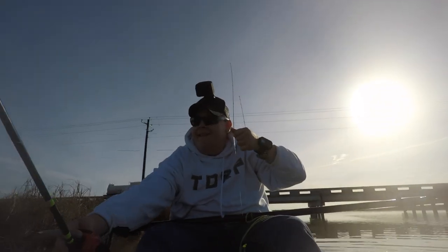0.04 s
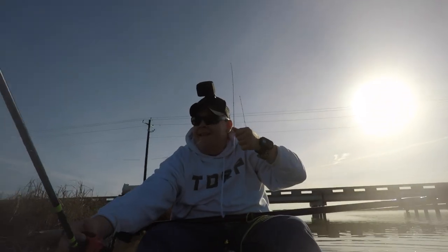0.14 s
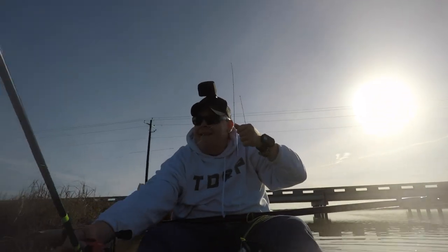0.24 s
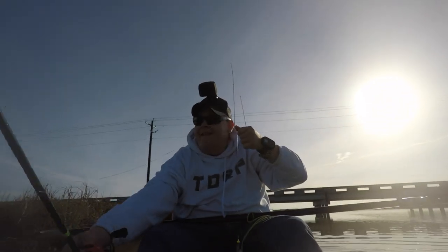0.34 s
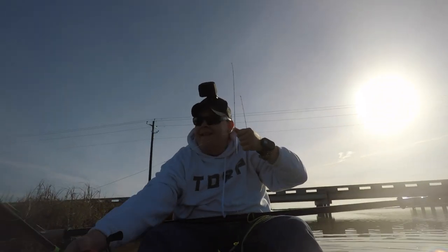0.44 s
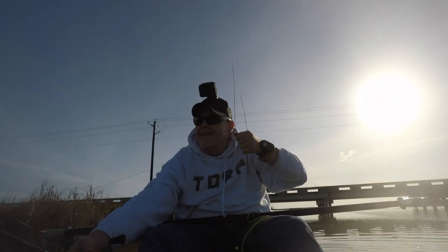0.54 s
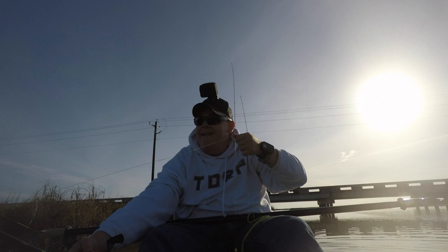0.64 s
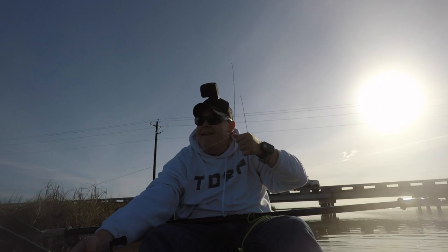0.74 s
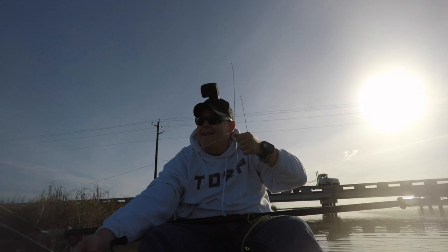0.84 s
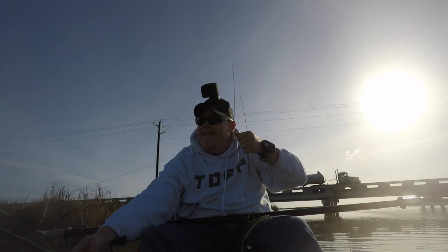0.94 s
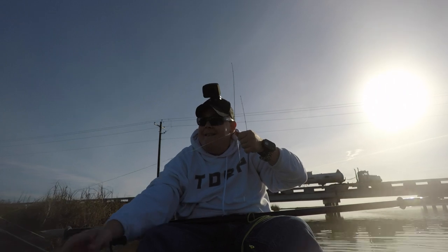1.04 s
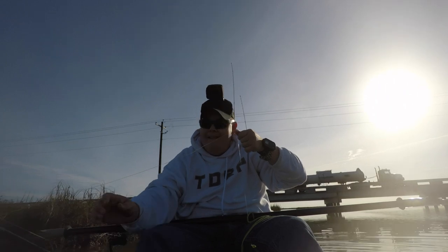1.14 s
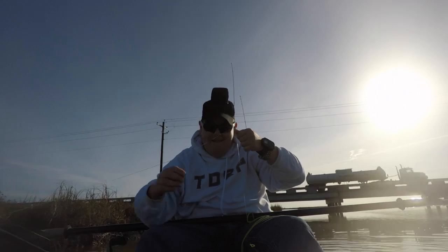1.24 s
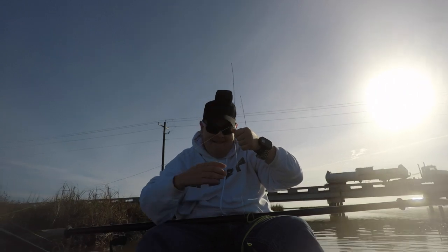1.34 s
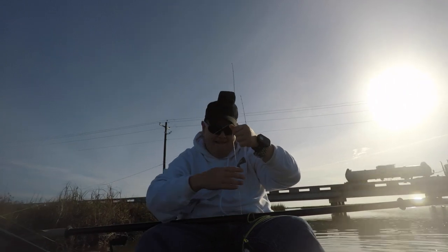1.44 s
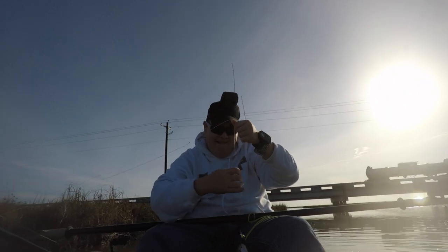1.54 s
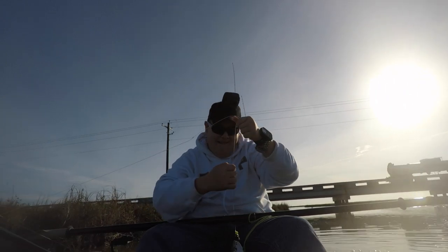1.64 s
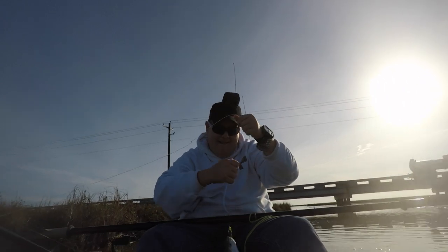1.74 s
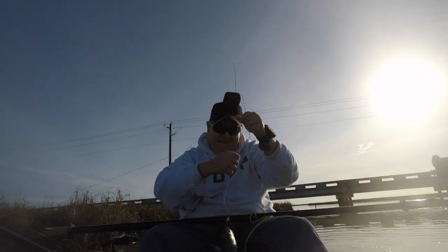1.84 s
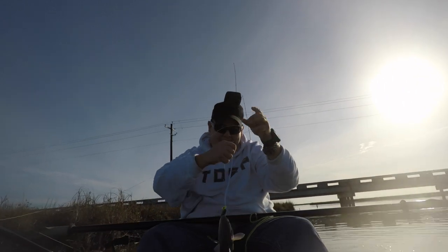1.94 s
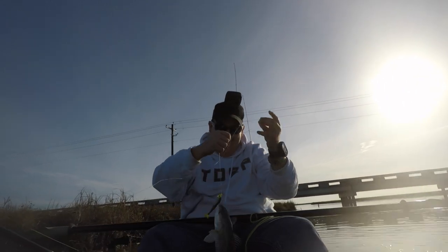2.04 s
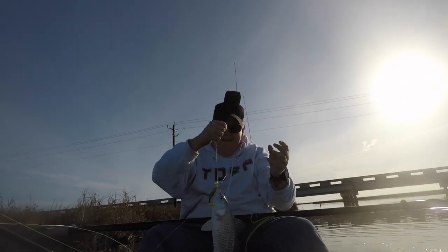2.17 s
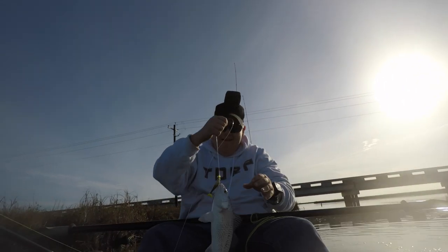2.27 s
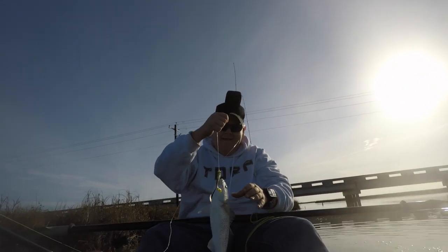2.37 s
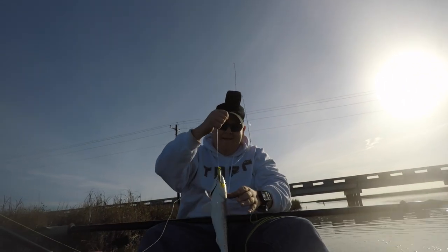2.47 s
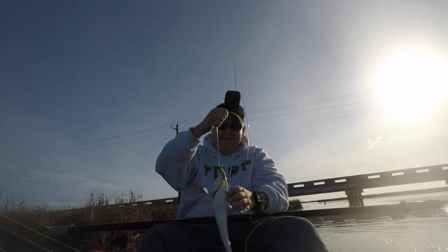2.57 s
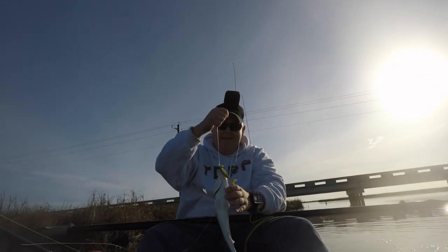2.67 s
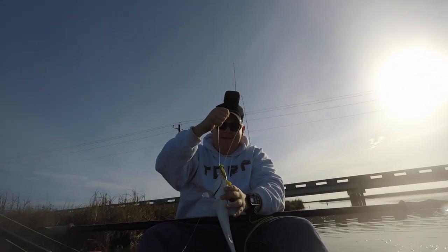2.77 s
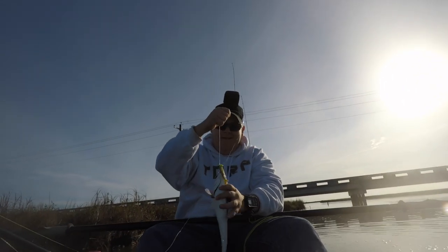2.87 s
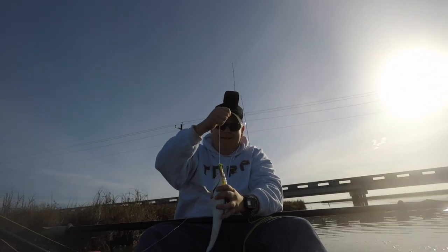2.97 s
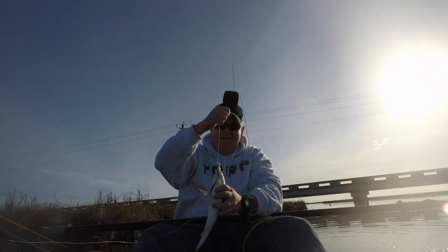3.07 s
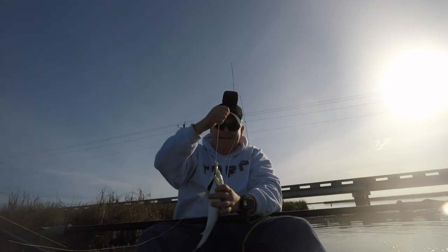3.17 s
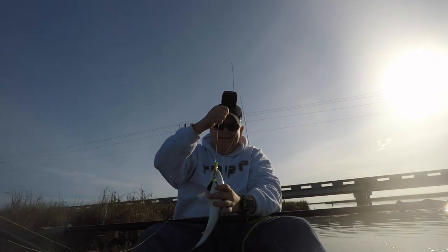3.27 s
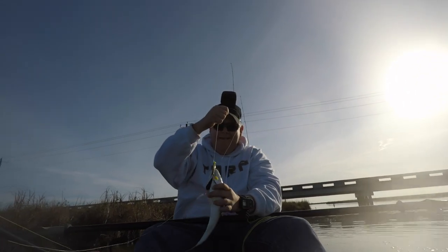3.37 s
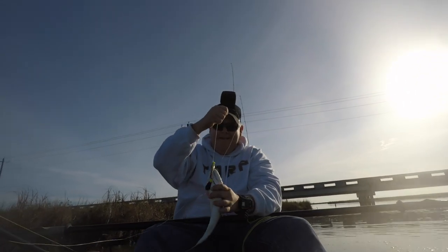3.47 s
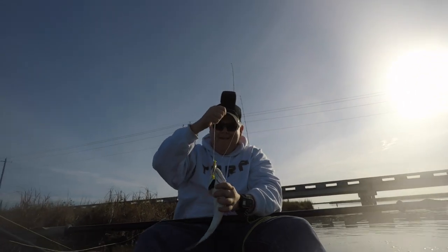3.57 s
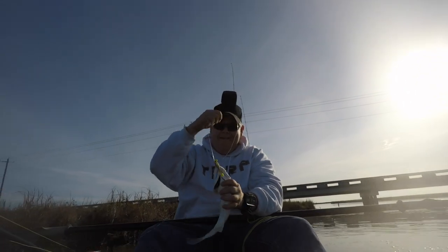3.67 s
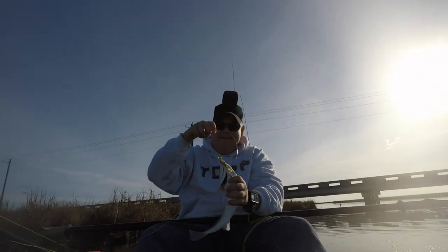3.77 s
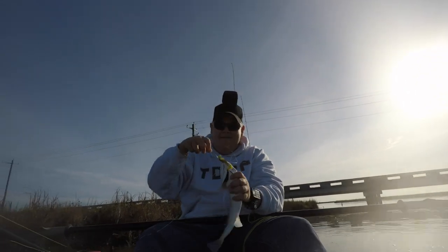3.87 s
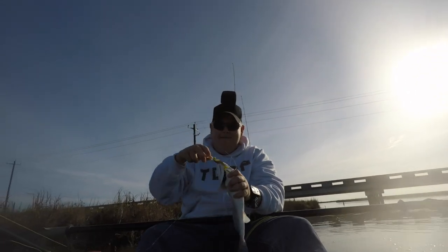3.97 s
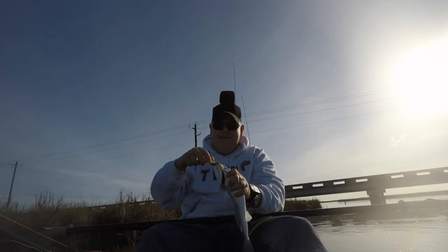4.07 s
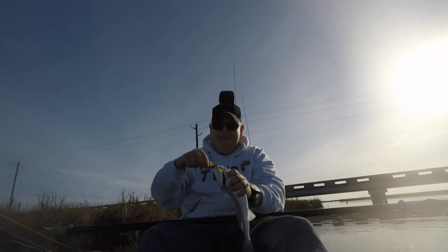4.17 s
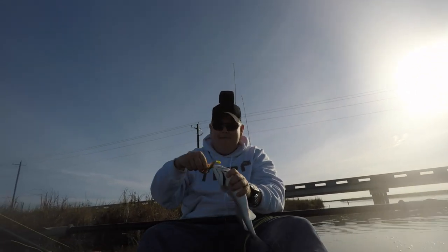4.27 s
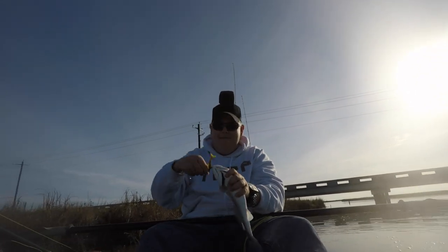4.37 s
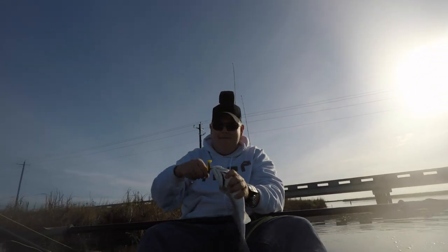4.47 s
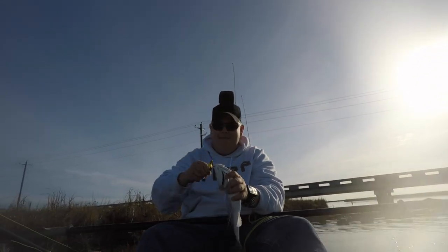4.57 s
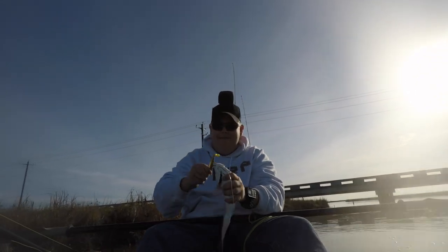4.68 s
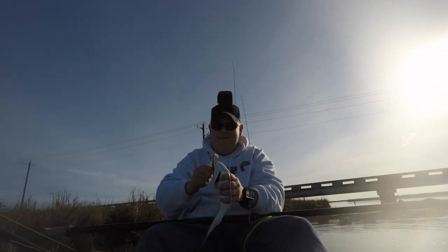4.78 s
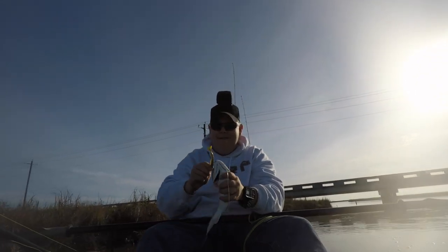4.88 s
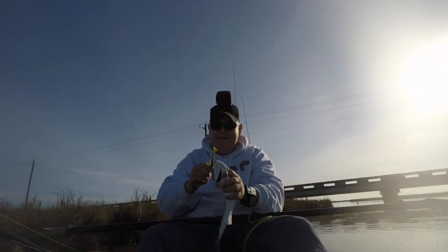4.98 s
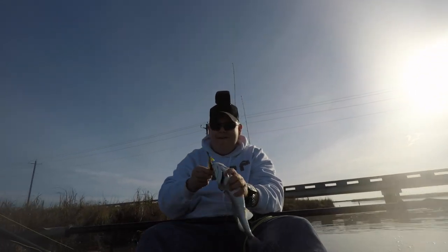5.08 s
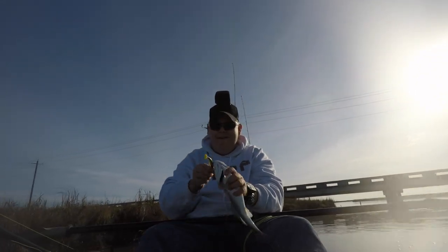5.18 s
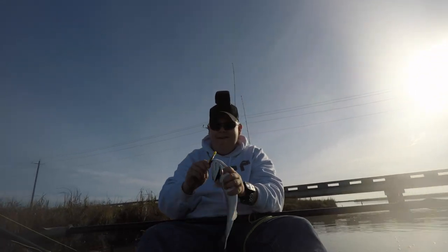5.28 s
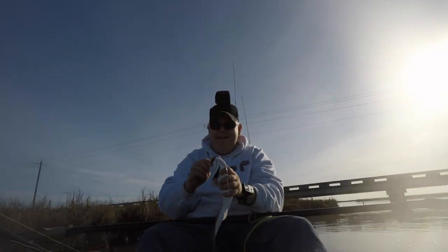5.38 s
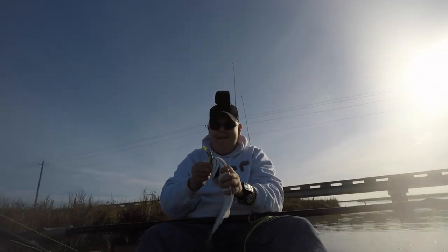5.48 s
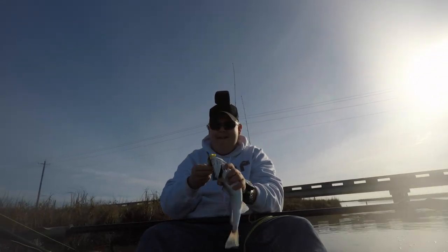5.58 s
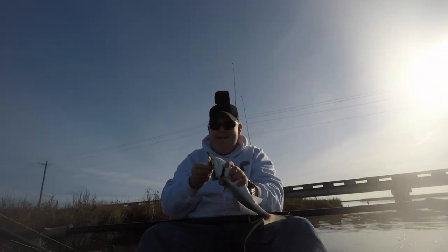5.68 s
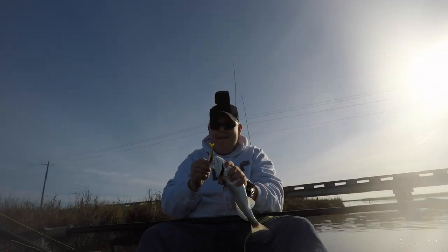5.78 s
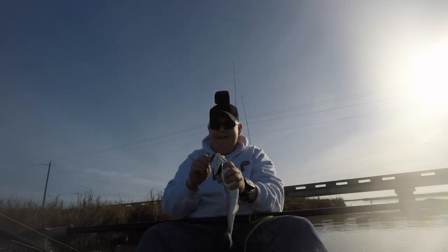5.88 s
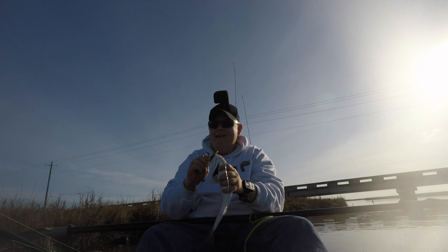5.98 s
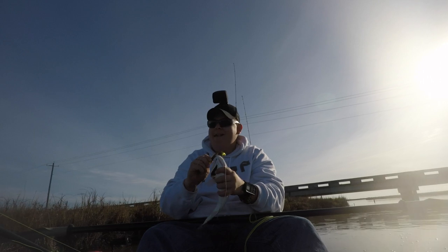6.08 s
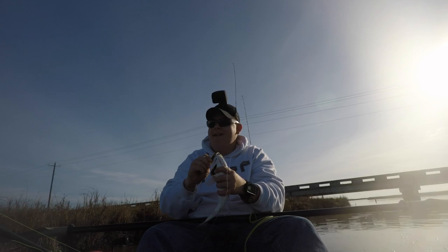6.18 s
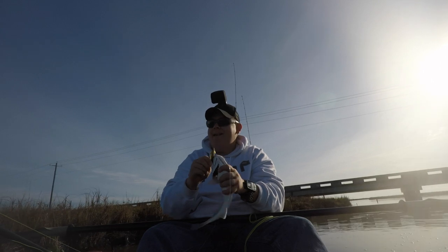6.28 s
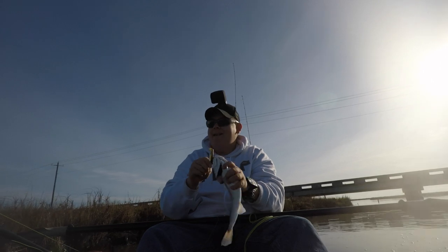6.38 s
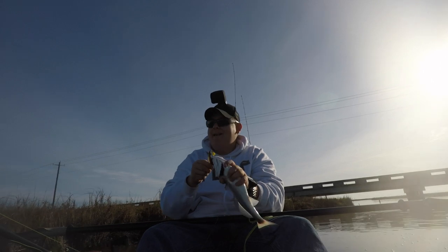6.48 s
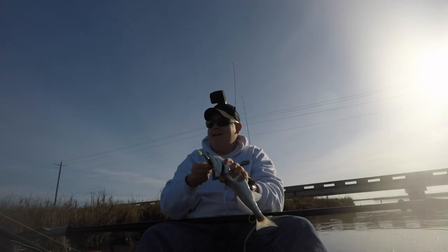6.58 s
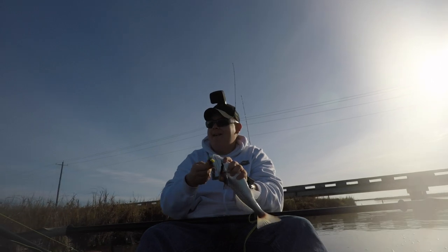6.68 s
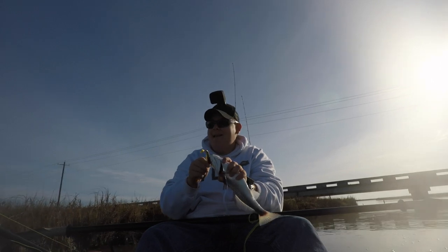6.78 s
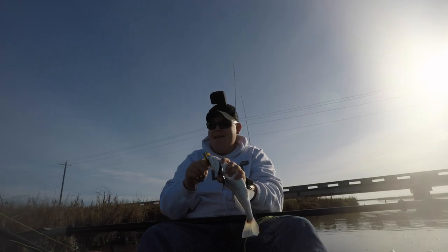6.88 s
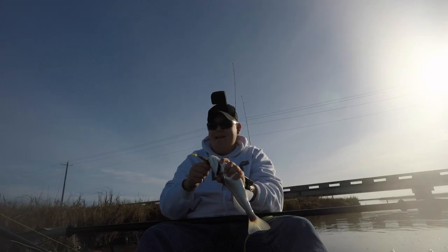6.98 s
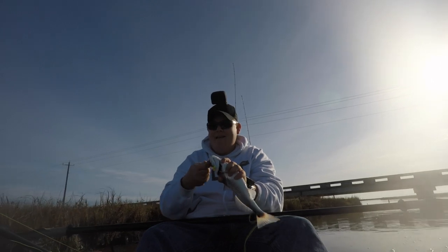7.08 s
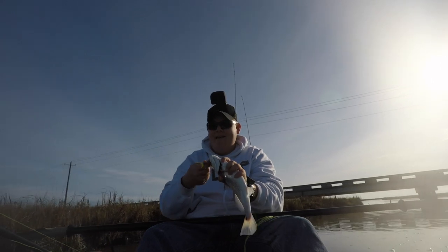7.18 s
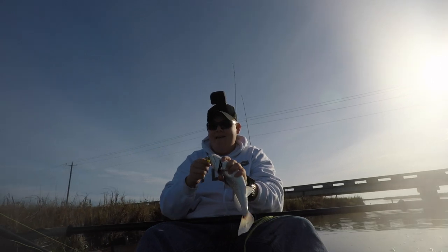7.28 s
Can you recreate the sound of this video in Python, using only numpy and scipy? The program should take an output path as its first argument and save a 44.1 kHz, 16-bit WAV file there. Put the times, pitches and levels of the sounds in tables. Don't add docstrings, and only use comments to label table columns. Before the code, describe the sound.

Outdoors beside a low concrete road bridge over water, heard from a small boat through a sealed camera with uneven stereo. In the first 0.2 seconds a reel clicks rapidly and evenly; soft hollow knocks on the plastic hull, leaning left, cluster thickest around 0.2 to 0.45 and thin out by 1.1. Distant road noise lies beneath. From about 1 second a lorry swells fast, with a short puff of air at 1.5, and is loudest around 1.9 to 2.6: deep deck boom, tyre roar, fluttering hiss, metallic rattle, engine drone and a singing tread tone that sags slightly in pitch. Dull joint thuds fall between 2 and 4 seconds as it fades. Following cars then hold a lower, softer rumble and hiss to the end at 7.3. Tiny tackle ticks dot the scene, the sharpest at 4.75, more from 5.4 to 7.

```python
import sys
import numpy as np
from scipy import signal
from scipy.fft import rfft, irfft
from scipy.io import wavfile
from scipy.ndimage import uniform_filter1d

SR = 44100
rng = np.random.default_rng(int(sys.argv[2]) if len(sys.argv) > 2 else 0)


def unload_wav(signal):
    wavfile.write(
        sys.argv[1],
        SR,
        np.round(np.clip(np.atleast_2d(signal).T, -1, 1) * 32767).astype(np.int16),
    )


def ratio_of_db(decibels):
    return 10 ** (np.asarray(decibels, float) / 20)


N = 322812
HZ = np.fft.rfftfreq(N, 1 / SR)
TIME = np.arange(N) / SR


def columns(table, at, log=False):
    x, *rest = np.transpose(table)
    if log:
        at, x = np.log(at + 1), np.log(x + 1)
    return [np.interp(at, x, column) for column in rest]


def walk(rate):
    k = int(SR / rate)
    held = np.repeat(rng.standard_normal(int(N / k) + 2), k)
    return 1.41 * uniform_filter1d(uniform_filter1d(held, k), k)[:N]


def colour(table):
    inside = (HZ >= table[0][0]) * (HZ <= table[-1][0])
    return ratio_of_db(columns(table, HZ, log=True)[0]) * inside


# (frequency [Hz], level [dB], phase lead [rad])
PORTS = [(40, -2.5, -2), (202, 5, 1.05), (429, 0, -1.87), (542, -4, -1.25), (1003, -15.5, -2),
         (1525, -9.5, -5.5), (1956, -13, -3), (2056, -4.5, -7.5), (3260, -19.5, -11.5), (5140, -2.5, -15),
         (6000, -5.5, -14), (7620, 5, -15), (8800, -6, -14.5), (14000, -16, -18.5)]
# (frequency [Hz], likeness [0-1])
LIKENESS = [(40, .93), (130, .85), (250, .95), (380, .8), (750, .95), (1100, .65), (1400, .92), (1800, .6),
            (2700, .5), (3900, .8), (5500, .92), (8000, .8), (8600, .35), (14000, .3)]


def ports(direct, other):
    db, lead = columns(PORTS, HZ, log=True)
    like = columns(LIKENESS, HZ, log=True)[0]
    mixed = like * direct + np.sqrt(1 - like ** 2) * other
    return np.array([ratio_of_db(db) * np.exp(1j * lead) * mixed, direct])


def layer(table, flicker_db, rate, count):
    both = ports(*(rfft(rng.standard_normal((2, N))) * colour(table)))
    low_hz, high_hz = table[0][0], table[-1][0]
    place = np.log(HZ / low_hz + 1e-9) / np.log(high_hz / low_hz) * (count - 1)
    out = 0
    for k in range(count):
        part = np.cos(np.pi / 2 * np.clip(place - k, -1, 1)) ** 2
        out = out + ratio_of_db(flicker_db * walk(rate)) * irfft(both * part, N)
    return out / np.std(out.mean(axis=0))


def tone(hz, db, blur_hz, steady):
    turn = np.exp(2j * np.pi * np.cumsum(hz) / SR)
    paths = [((steady + walk(blur_hz) + 1j * walk(blur_hz)) * turn).real for _ in range(2)]
    return ratio_of_db(db) * np.array(paths)


def bursts(table, rise, tail):
    out = np.zeros(N)
    for s, db, length in table:
        t = TIME - s
        out += ratio_of_db(db) * np.clip(t / rise, 0, 1) * np.exp(-np.clip(t - length, 0, None) / tail)
    return out


# (time [s], nearness [dB])
LORRY = [(0, -25), (.2, -27.5), (.5, -28), (.8, -20), (1.1, -15), (1.36, -5.5), (1.55, -1.5), (1.9, 0),
         (2.5, 0.5), (2.9, -2), (3.2, -3), (3.55, -8.5), (4, -16.5), (5, -23), (7.32, -35)]
# (time [s], flow [dB])
FLOW = [(0, -16.5), (.3, -21), (.65, -15), (1.2, -34), (3.7, -3), (4.1, -2.5), (4.6, 0), (5.2, -1.2),
        (5.6, -1.5), (5.85, 1.34), (6.2, 0.1), (6.55, 0.65), (7, -1.5), (7.32, -1.5)]


def heard(lorry_db, near, lag, cars_db, flow):
    lorry_db = lorry_db + near * columns(LORRY, np.clip(TIME - lag, 0, None))[0]
    cars_db = cars_db + flow * columns(FLOW, TIME)[0]
    return 10 * np.log10(ratio_of_db(2 * lorry_db) + ratio_of_db(2 * cars_db))


# (time [s], level [dB])
SIGHT = [(0, 4), (.3, 3.5), (.55, -7), (.8, -0.5), (1.05, 5), (1.3, -1.5), (1.5, -1), (2.2, 0),
         (2.75, -0.5), (3.1, -1), (3.5, -0.5), (3.8, 1.5), (4.1, 1), (4.6, -1.5), (5.6, -0.5), (6.2, 1.5),
         (6.6, 2.5), (7.32, -0.5)]
# (time [s], added hiss [dB], length [s])
PATCHES = [(1.305, -6, .012), (1.87, -4, .015), (1.95, -13, 0.017), (2.157, -9, 0.0079), (2.24, -4.5, .035),
           (2.33, -8, 0.014), (2.45, -5, 0.013), (2.515, -7, 0.022), (2.644, -3, .015), (2.695, -4, .012),
           (2.78, -11, .015), (3.08, -10, .012), (3.61, -4, .01), (3.733, -4, .01), (4.643, -6, .008),
           (5.01, -11, .008), (5.8, -9, 0.055), (6.55, -14, .04)]


def tyre_db():
    return columns(SIGHT, TIME)[0] + 20 * np.log10(1 + bursts(PATCHES, 0.003, 0.0057))


# (time [s], firing rate [Hz], tread block rate [Hz])
PITCH = [(0, 62.5, 436), (1.6, 62, 432), (2.2, 60.6, 428), (2.9, 59.2, 425), (3.3, 59.1, 420),
         (3.8, 58.9, 413), (4.5, 58.7, 411), (7.32, 58.6, 407)]
# (time [s], level [dB])
EFFORT = [(0, -19), (.8, -18), (1.3, -13), (1.7, -1), (1.95, -3.5), (2.3, -1), (2.6, -1.5), (2.85, 3),
          (3.2, -3), (3.7, -9.5), (4.3, -5.5), (5.1, -10), (5.5, -12), (6.05, -6), (6.22, -17), (6.45, -10),
          (6.8, -5), (7.32, -8)]
# (time [s], level [dB])
TREAD = [(0, -34.5), (1.35, -31), (1.64, -6), (1.76, 5), (2.08, 9.5), (2.3, 2.5), (2.5, 3.5), (2.78, 1.5),
         (2.9, 5.5), (3.3, -1.5), (3.7, -7.5), (4.1, -8), (4.6, -10.5), (5.35, -12.5), (5.55, -19),
         (7.32, -54)]


def engine_and_tread():
    fire_hz, tread_hz = columns(PITCH, TIME)
    effort_db, tread_db = columns(EFFORT, TIME)[0], columns(TREAD, TIME)[0]
    engine = tone(2 * fire_hz, 0.71 * effort_db - 39.5, 20, 1.78)
    engine = engine + tone(3 * fire_hz, 1.41 * effort_db - 34.0, 22, 1.0)
    tread = tone(tread_hz, tread_db - 36.5, 25.03, 1.52)
    tread = tread + tone(2 * tread_hz, 0.97 * tread_db - 43, 40, 0.3)
    whistle = tone(2.49 * tread_hz, 1.03 * np.minimum(tread_db, -12) - 26.5, 150, 0.15)
    return engine + tread + whistle


def turbo():
    start_s, span_s, start_hz, sag_hz_per_s, peak_db = 1.38, 0.13, 8990, 1100, -70
    since = TIME - start_s
    hz = np.clip(start_hz - sag_hz_per_s * since, 8000, None)
    return tone(hz, peak_db - 9 * (since / span_s) ** 2, 110, 0.7)


# (frequency [Hz], level [dB per Hz])
RATTLE = [(1500, -9), (1900, -4), (2400, 0.5), (2900, 2.5), (3700, 3.5), (4300, -6), (5200, -8)]


def running_gear():
    db = heard(-45.5, 1.17, -0.0437, -66, 1.3) + 0.31 * tyre_db() + 0.63 * walk(11)
    return ratio_of_db(db) * layer(RATTLE, 0.7, 16, count=3)


# (time [s], level [dB], length [s])
PUFFS = [
    (1.5285, -35, 0.003),
    (1.5325, -29.5, 0.022),
    (1.574, -40, .025),
    (1.44, -46, .015),
    (1.635, -45, .025),
    (2.245, -45, .02),
    (2.36, -48, .015),
    (2.49, -48, 0.014),
]
# (frequency [Hz], level [dB per Hz])
PUFF = [(600, 9), (1100, 16.5), (1500, 5), (2200, -6), (2800, 10.5), (3700, 6.5), (4400, -4), (5600, -5),
        (7000, -14), (9500, -20), (13500, -45)]


def air_puffs():
    return bursts(PUFFS, 0.003, 0.024) * layer(PUFF, 0.6, 60, count=3)


def lorry():
    tones = engine_and_tread() + turbo()
    return irfft(ports(*rfft(tones)), N) + running_gear() + air_puffs()


# (frequency [Hz], level [dB per Hz])
BOOM = [(20, -27), (45, -14), (80, -11), (100, -3), (118, -5), (140, -6), (175, -4), (210, -1), (280, -45)]
# (frequency [Hz], level [dB per Hz])
RUMBLE = [(170, -14), (230, -1), (290, -2), (345, -7.5), (430, -2.5), (520, -4.5), (650, -7.5), (850, -17)]


def deck():
    boom = ratio_of_db(heard(-27.5, 1, 0.04, -38, 0.26)) * layer(BOOM, 1.96, 6.7, count=4)
    axles = ratio_of_db(heard(-27, 2, 0.01, -44.5, -0.1)) * layer(RUMBLE[:4], 1.0, 3.58, count=2)
    wheels = ratio_of_db(heard(-30.5, 0.94, 0.17, -48, 2.5)) * layer(RUMBLE[3:], 1.0, 8, count=3)
    return boom + axles + wheels


# (frequency [Hz], level [dB per Hz])
ROAR = [(550, -5.5), (720, -4.5), (880, 1), (1060, 0.5), (1250, -5.5), (1600, -15), (2000, -21),
        (2600, -33.5)]
# (frequency [Hz], level [dB per Hz])
HISS = [(3900, -3), (4800, -5.5), (5600, -1), (6400, -2.5), (7400, -13), (8100, -20), (9000, -15),
        (10300, -35), (11500, -43)]
# (frequency [Hz], level [dB per Hz])
SHEEN = [(8300, -17), (9200, 1), (10300, 0.5), (11300, -8.5), (12400, -7.5), (13400, -17.5), (14000, -25.5)]


def tyres():
    flutter_db = 0.9 * walk(18)
    view_db = tyre_db()
    roar = ratio_of_db(heard(-33.5, 1.05, 0.05, -42, 0.96)) * layer(ROAR, 0.88, 21.1, count=4)
    grit_db = heard(-54.5, 2.8, 0.51, -69, 0.5) + 0.99 * view_db + flutter_db
    grit = ratio_of_db(grit_db) * layer(HISS[:3], 0.88, 9.2, count=2)
    hiss_db = heard(-51, 1.51, -0.01, -65.5, 1) + view_db
    hiss = ratio_of_db(hiss_db + flutter_db) * layer(HISS[1:], 1.0, 11, count=4)
    sheen = ratio_of_db(0.72 * hiss_db - 34.0 + flutter_db) * layer(SHEEN, 1.6, 12, count=3)
    return roar + grit + hiss + sheen


# (time [s], level [dB], length [s])
JOINTS = [(2.07, -23, 0.05), (2.44, -30, 0.06), (2.67, -25, 0.081), (2.935, -24.5, 0.022),
          (3.28, -24.5, 0.016), (3.59, -30, 0.021), (3.92, -34, 0.071), (5.8, -39, 0.13),
          (6.74, -43, 0.073), (7.02, -47, 0.024), (1.72, -34, 0.062)]
# (frequency [Hz], level [dB per Hz])
THUD = [(90, -35), (150, 0.5), (250, -5), (400, -5), (600, -0.5), (1000, -9), (1500, -34)]


def joints():
    return bursts(JOINTS, 0.032, 0.0084) * layer(THUD, 0.75, 25, count=2)


# (time [s], peak [dB], brightness [dB], left minus right [dB], ring length [share])
KNOCKS = [(0.046, -38.5, -22, 10.5, 1.1), (0.101, -32, -2, 19, 0.88), (0.186, -22, 3, 13, 0.38),
          (0.202, -18.5, -1, 9, 0.28), (0.21, -23, 7.5, 16, 0.54), (0.219, -25.5, -17, 9, 0.54),
          (0.238, -27, -6, 10, 0.9), (0.25, -23, 0, 12, 0.55), (0.2947, -15.5, -5.5, 16, 0.45),
          (0.304, -13, -1.5, 15, 0.38), (0.3127, -13, -1.5, 17, 0.66), (.322, -31, 2, 16, 0.62),
          (0.388, -27, -8, 20, 1.8), (0.411, -24, -1, 12, .6), (0.4225, -19.5, -7.5, 12, 0.59),
          (0.432, -28, -13, 14, 1.2), (0.489, -27.5, -4, 18, 1.1), (0.509, -32, -19, 8, 1.1),
          (0.591, -27, -4, 24.5, 0.73), (0.689, -27, -5, 16, 0.63), (0.763, -19.5, -9, 8, 0.75),
          (0.85, -23, -6, 8, 1.3), (0.939, -27, 2, 5, 1.6), (1.124, -20, 0, 10, 1.7)]
# (frequency [Hz], level [dB], decay t60 [s])
HULL = [
    (103.8, -4.5, 0.17),
    (211.4, 5, 0.071),
    (316.5, -3.5, 0.11),
    (452, -19.5, 0.24),
    (760, -23, 0.022),
]


def hull():
    out, t = np.zeros((2, N + SR)), TIME[:SR // 4]
    chance = rng.standard_normal((len(KNOCKS), 2 * len(HULL)))
    for (s, db, bright_db, pan_db, share), c in zip(KNOCKS, chance):
        ring = 0
        for k, (hz, mode_db, t60) in enumerate(HULL):
            size = ratio_of_db(mode_db + bright_db * np.log2(hz / 200) + 1.6 * c[k])
            struck_hz = hz * (1 + 0.049 * c[-1 - k])
            decay = np.exp(-np.log(1000) * t / (t60 * share))
            ring = ring + size * np.sin(2 * np.pi * struck_hz * t) * decay
        ring = ring * np.clip(t / 0.0021, 0, 1)
        i = int(s * SR)
        sides_db = np.array([[pan_db], [-pan_db]]) / 2
        out[:, i:i + len(t)] += ring * ratio_of_db(db - 9.5 + sides_db)
    return out[:, :N]


def reel():
    start_s, step_s, count = 0.0155, 0.0216, 9
    ring_hz, t60_s, level_db = 1130, 0.011, -37
    starts = start_s + step_s * np.arange(count)[:, None]
    t = np.clip(TIME[:SR // 2] - starts, 0, None)
    size = ratio_of_db(level_db + 1.2 * rng.standard_normal((count, 1)))
    ring = np.sin(2 * np.pi * ring_hz * t) * np.exp(-np.log(1000) * t / t60_s)
    clicks = size * np.clip(t / 0.0011, 0, 1) * ring
    return np.pad(clicks.sum(axis=0), (0, N - SR // 2))


# (time [s], peak [dB], centre
# [Hz], width [octaves], left minus right [dB])
TICKS = [(.185, -57, 5470, 0.46, 4), (0.54, -49, 810, .3, 10), (0.26, -54, 2300, 0.89, 5),
         (.3875, -63, 6200, 0.73, -4), (.42, -71, 6500, 1.1, 1), (.77, -71, 7500, .8, 0),
         (1.16, -64, 5000, 1.2, -4), (2, -48, 7500, 0.57, -5), (2.8, -53, 10500, .6, -6),
         (2.649, -44, 5800, 0.53, -11), (2.667, -54.5, 10500, .5, -3.5), (3.082, -54.5, 9500, .9, -3),
         (4.7483, -44, 3960, .4, 2), (4.7482, -45, 7000, 1.0, -6), (4.7503, -41, 6900, 0.48, -7),
         (4.7498, -43.5, 3200, 1.0, -9), (4.751, -59, 13300, 0.13, -2.5), (1.533, -47, 7000, .9, -2),
         (1.539, -47.5, 7000, 1.1, -4), (.313, -72, 9000, .4, 0), (.412, -75, 11500, .2, 0),
         (.515, -69, 7000, .6, 0), (.58, -69, 6500, .6, 0), (4.7484, -52, 11000, .7, -2),
         (5.442, -55, 6100, 0.34, -5.5), (5.501, -51, 6100, 0.3, -3), (5.812, -51, 5900, .25, -6),
         (7.068, -58, 3200, .5, -5), (5.829, -63, 11150, .6, -2.5), (6.296, -51.5, 6500, 1.7, -4),
         (6.2953, -55, 12000, .6, 1.5), (6.765, -51, 2700, 0.89, -4), (6.766, -66, 11500, 0.31, -5),
         (6.883, -51, 2900, 1, -7), (6.952, -54, 2440, 0.24, -16.5)]


def tackle():
    out, t = np.zeros((2, N)), TIME[:2048]
    for s, db, hz, octaves, pan_db in TICKS:
        length = 0.0068 * (hz / 1000) ** -0.4
        decay = np.exp(-np.clip(t - length, 0, None) / 0.0012)
        grit = rng.standard_normal((2, 2048)) * decay
        edges = hz * 2 ** (np.array([-0.5, 0.5]) * max(octaves, 0.1))
        edges = np.clip(edges, 1, SR / 2 - 1)
        band = signal.sosfilt(signal.butter(2, edges, "band", fs=SR, output="sos"), grit)
        i = int(s * SR)
        sides_db = np.array([[pan_db], [-pan_db]]) / 2
        out[:, i:i + 2048] += band / np.abs(band).max() * ratio_of_db(db + 6.5 + sides_db)
    return out


def scene():
    return lorry() + deck() + tyres() + joints() + hull() + reel() + tackle()


# (frequency [Hz], level [dB per Hz])
SELF_NOISE = [(300, -99.5), (1500, -94), (2200, -99), (3000, -103), (5500, -112), (7000, -118),
              (9000, -127), (13000, -132)]


def self_noise():
    return irfft(rfft(rng.standard_normal(N)) * colour(SELF_NOISE), N) * np.sqrt(SR / 2)


def band_limit(x):
    return signal.sosfilt(signal.butter(12, 13910, fs=SR, output="sos"), x)


def record(dry):
    rumble_cut = signal.butter(2, 80, "high", fs=SR, output="sos")
    top_cut = signal.butter(16, 14100, fs=SR, output="sos")
    mix = signal.sosfilt(np.vstack([rumble_cut, top_cut]), dry + self_noise())
    return band_limit(mix)


dry = scene()
out = record(dry)
unload_wav(out)
```